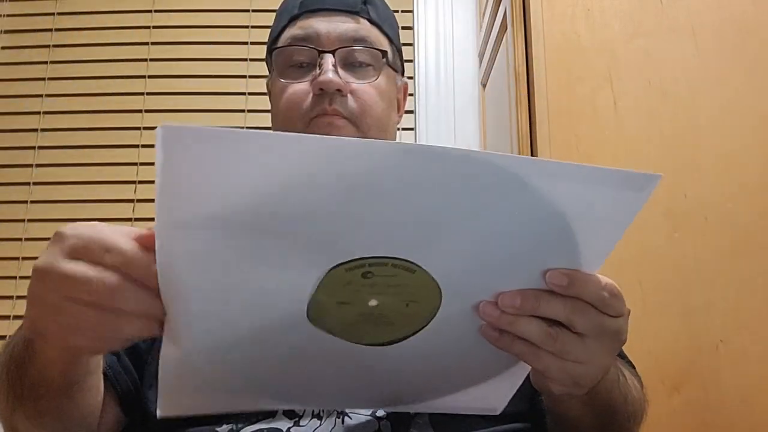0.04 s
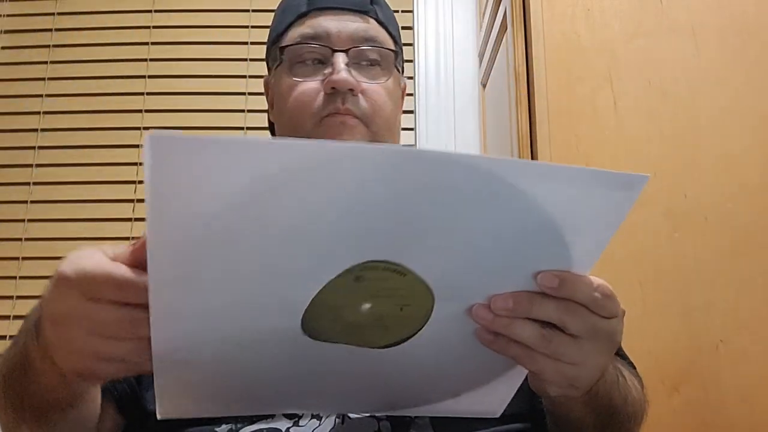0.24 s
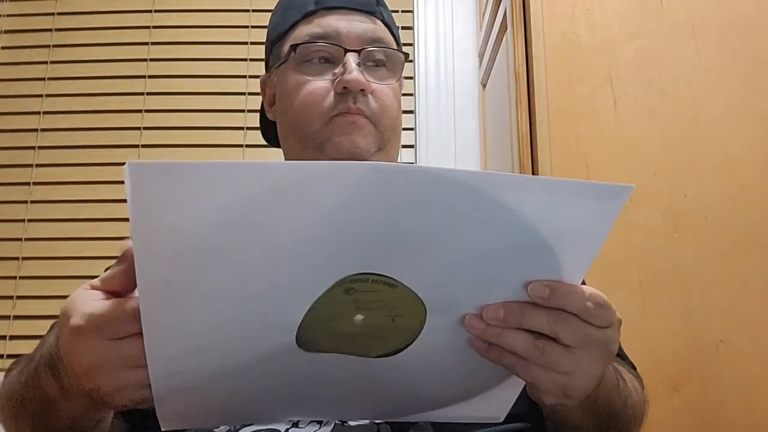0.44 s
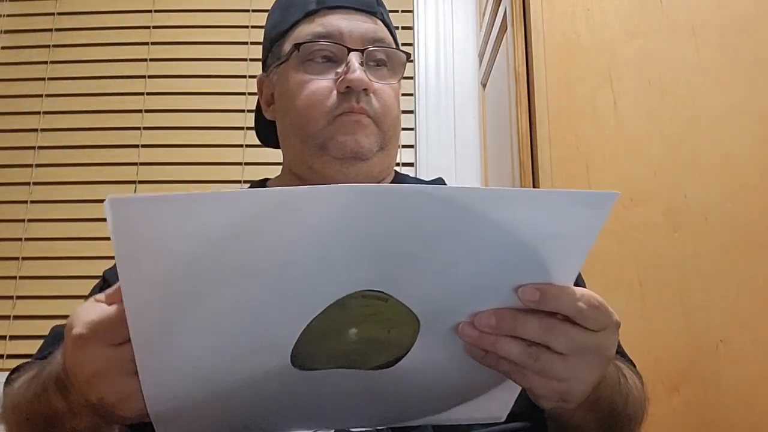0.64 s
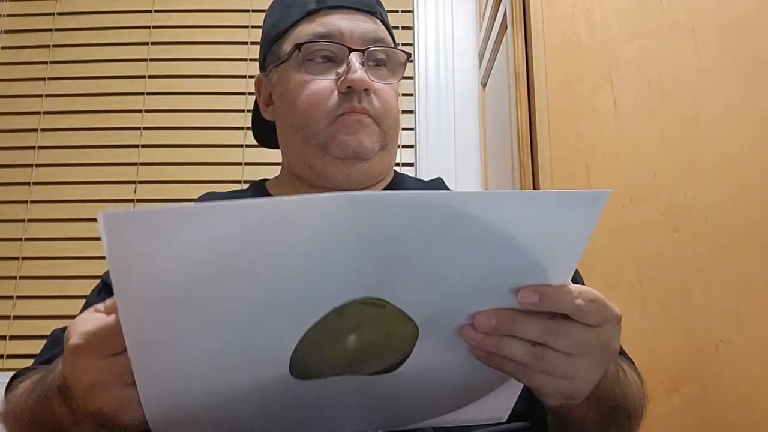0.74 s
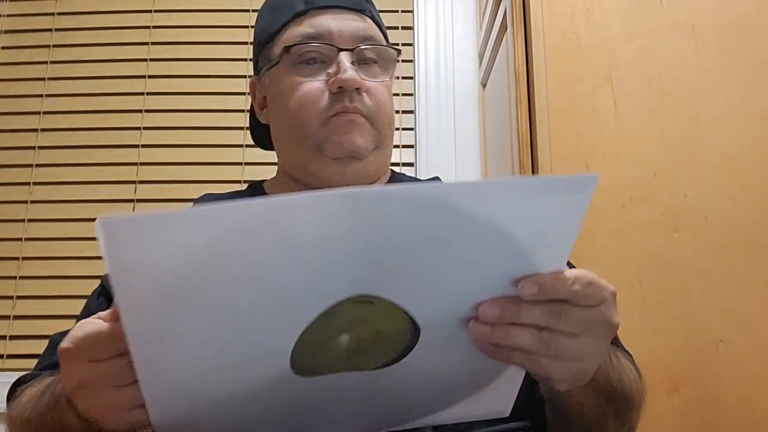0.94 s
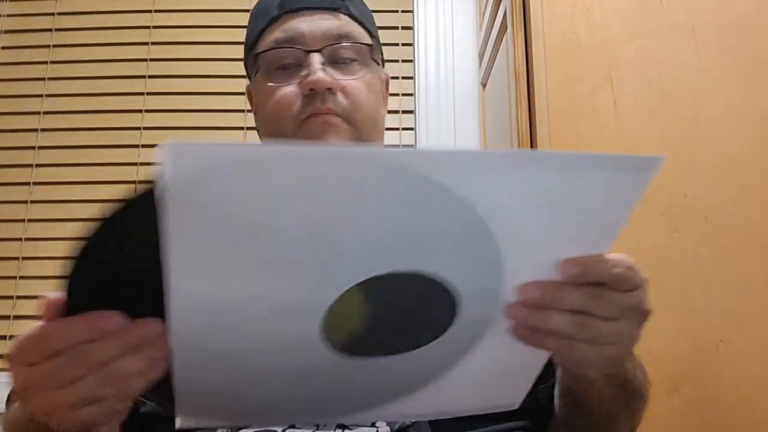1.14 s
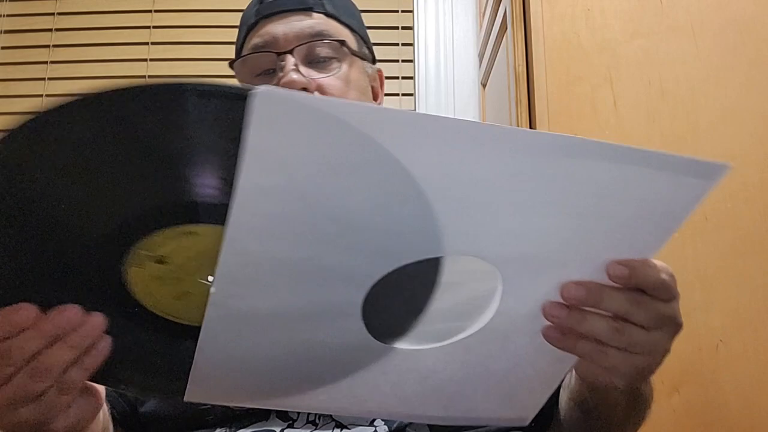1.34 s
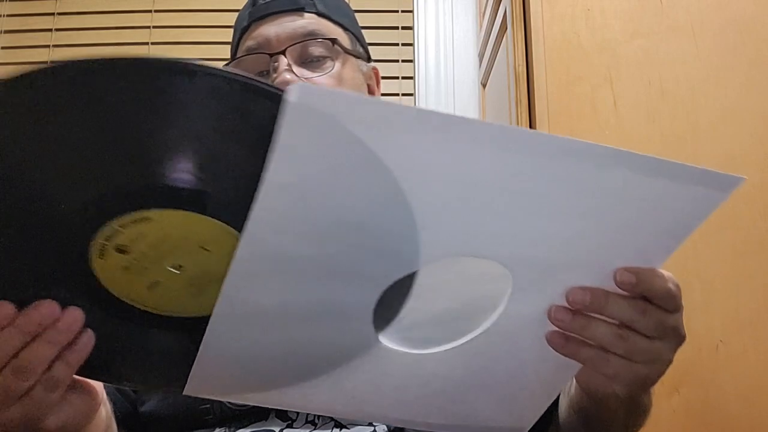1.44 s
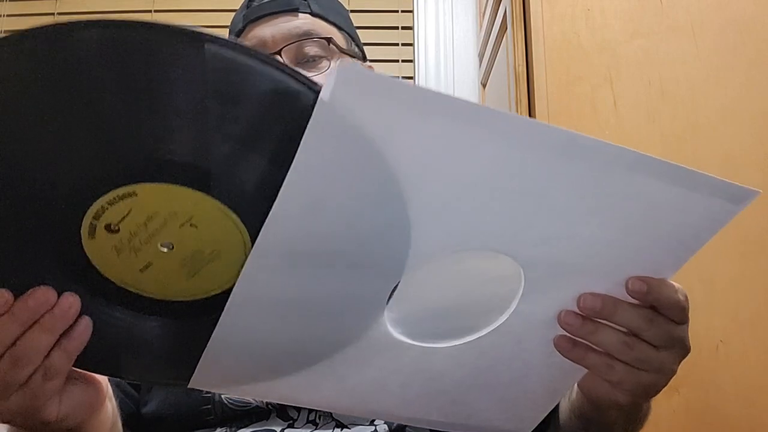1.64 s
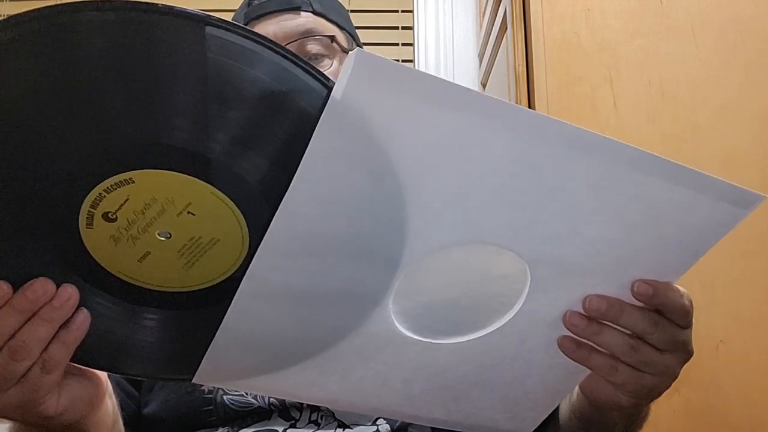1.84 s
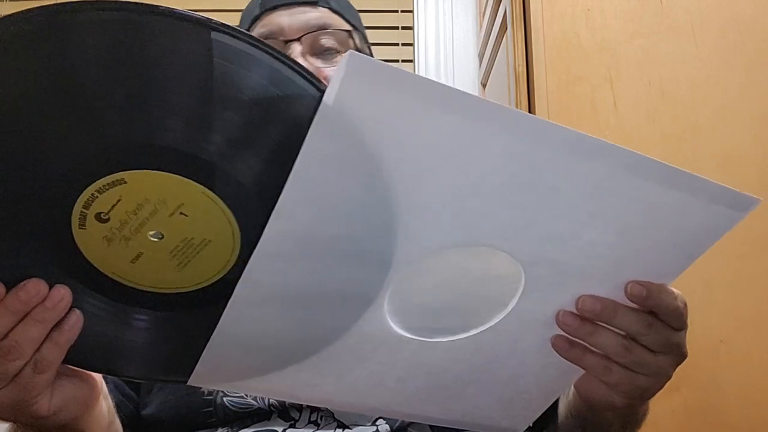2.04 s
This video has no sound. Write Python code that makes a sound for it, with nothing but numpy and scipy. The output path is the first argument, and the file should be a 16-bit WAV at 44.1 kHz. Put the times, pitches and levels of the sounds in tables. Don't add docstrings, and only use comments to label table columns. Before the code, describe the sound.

Paper record sleeve rustles and pops sharply, then a vinyl disc slides out with a hiss

```python
import sys
import numpy as np
from scipy import signal
from scipy.fft import rfft, irfft, next_fast_len
from scipy.io import wavfile
from scipy.ndimage import uniform_filter1d, map_coordinates

SR = 44100
rng = np.random.default_rng(int(sys.argv[2]) if len(sys.argv) > 2 else 0)


def voltage_ratio(level):
    return 10 ** (np.asarray(level, float) / 20)


def wav_out(sig):
    wavfile.write(sys.argv[1], SR, np.round(np.clip(np.atleast_2d(sig).T, -1, 1) * 32767).astype(np.int16))


N = 92610


def unit(x):
    return x / np.sqrt(np.mean(x ** 2) + 1e-20)


def along(points, hz):
    f, value = np.transpose(points)
    return np.interp(np.log(hz + 1), np.log(f + 1), value)


def curves(rows):
    s, *columns = np.transpose(rows)
    t = np.arange(N) / SR
    return [np.interp(t, s, column, left=-120, right=-120) for column in columns]


def wobble(rate):
    knots = rng.standard_normal(int(N * rate / SR) + 4)
    return map_coordinates(knots, [np.arange(N) * rate / SR])


def filtered(x, response):
    size = next_fast_len(N + SR // 2)
    hz = np.fft.rfftfreq(size, 1 / SR)
    return irfft(rfft(x, size) * response(hz), size)[..., :N]


def coloured(x, spectrum):
    size = 4096
    gain = voltage_ratio(along(spectrum, np.fft.rfftfreq(size, 1 / SR)))
    cepstrum = irfft(np.log(gain + 1e-4), size)
    cepstrum[1:size // 2] *= 2
    cepstrum[size // 2 + 1:] = 0
    impulse = irfft(np.exp(rfft(cepstrum)), size)
    return signal.fftconvolve(x, np.atleast_2d(impulse / np.linalg.norm(impulse)), axes=1)[:, :N]


def modes(peaks):
    def response(f):
        total = 0
        for k, (centre, width, db) in enumerate(peaks):
            loss = 1j * f * width
            total = total + (-1) ** k * voltage_ratio(db) * loss / (centre * centre - f * f + loss)
        return total
    return response


def spread(pair, alike):
    def turned(hz):
        angle = np.arccos(np.clip(along(alike, hz), -1, 1)) / 2
        return np.array([np.cos(angle), np.sin(angle)])
    mid, side = filtered(pair, turned)
    return np.array([mid + side, mid - side])


# frequency in Hz, level in dB per Hz.
HUM_COLOUR = [(20, -19), (70, -15), (300, -15.5), (500, -19), (1250, -41.5), (1900, -38), (3000, -48.5),
              (16000, -50.5)]
# frequency in Hz, width in Hz, level in dB.
HUM_MODES = [(68, 18, -3), (300, 71, 2)]
# frequency in Hz, left-right likeness from -1 to 1.
HUM_ALIKE = [(60, 1), (380, 0.86), (2380, 0.023), (15000, -0.09)]
HUM_DB, HUM_SWELL_DB = -59.5, 1.5


def hum():
    noise = rng.standard_normal((2, N)) * voltage_ratio(HUM_SWELL_DB * wobble(11))
    shaped = filtered(noise, lambda hz: voltage_ratio(along(HUM_COLOUR, hz)) * (1 + abs(modes(HUM_MODES)(hz))))
    return voltage_ratio(HUM_DB) * unit(spread(shaped, HUM_ALIKE))


def slips(rate, size_db, fizz_db):
    slip_cap_db = 12
    hit = rng.random((2, N)) < rate / SR
    over_db = np.minimum(size_db * rng.exponential(size=(2, N)), slip_cap_db)
    size = voltage_ratio(over_db) * rng.standard_normal((2, N))
    return unit(unit(hit * size) + voltage_ratio(fizz_db) * rng.standard_normal((2, N)))


# frequency in Hz, level in dB per Hz.
SHEET = [(90, -48), (170, -12), (290, -4), (520, -6), (1190, -12.5), (2300, -7), (6000, -22.5),
         (9000, -60.5)]
# frequency in Hz, level in dB per Hz.
FIBRE = [(2060, -28), (3500, -2), (4460, -1), (7180, 0), (7850, 1.5), (10700, -7.5), (12900, -3),
         (14900, -3.5), (16000, -19)]
# frequency in Hz, width in Hz, level in dB.
POCKET = [(1806, 120, 6), (2460, 140, 1.5), (3375, 420, 0.5), (7830, 341, 0)]


def friction(body_db, fibre_db, rate, clump_db, fizz_db):
    clumps = voltage_ratio(clump_db * wobble(39.8) + clump_db * wobble(150))
    body_drive = voltage_ratio(body_db) * clumps * slips(rate, 2.12, fizz_db)
    body = coloured(body_drive, SHEET) * [[1], [.7]]
    fibre_gain = voltage_ratio(fibre_db + 1.5 * wobble(25.02))
    fibre = coloured(fibre_gain * clumps * slips(4 * rate, 2.5, fizz_db + 12.0), FIBRE)
    return filtered(body + fibre, lambda hz: 1.093 + 0.47 * abs(modes(POCKET)(hz)))


# time in seconds, pressure in dB, fibre hiss over it in dB.
RUB = [
    [(0, -74.5, 0.5), (.05, -71, 6.5), (.06, -47, -13), (.11, -61, 2), (.124, -47.5, -14),
     (.15, -55.5, -5.5)],
    [(.29, -49.5, -12), (.382, -56.5, 2), (.392, -46, -1.5), (.44, -50, -5), (.46, -48.5, -2.5),
     (.568, -65, -3.5), (.598, -65, -5)],
    [(.608, -47, -10.5), (.68, -51.5, -1), (.764, -48, 0.5), (.818, -57, -4), (.87, -50, -0.5),
     (.956, -56.5, -4), (1.0, -70, -6)],
]
RUB_DB = -1.5


def fingers():
    rows = sorted(row for gesture in RUB for row in gesture)
    pressure_db, fibre_db = curves(rows)
    return friction(pressure_db + RUB_DB, pressure_db + fibre_db + RUB_DB, 2500, 0.93, 2.3)


# start in seconds, level in dB,
# length in ms, pitch in Hz, crisp edge in dB.
SNAPS = [(.062, -41.5, 1.8, 2020, 2.5), (.071, -50.5, 2.3, 2520, 7), (0.08, -49, 2, 3000, 8),
         (.084, -49.5, 4, 1140, -5), (.122, -39.5, 4.8, 2130, -33.5), (0.162, -33, 3.2, 7550, 1),
         (0.1685, -36, 2.3, 11420, -0.5), (.2282, -44, 8, 2450, 1.5), (0.2347, -44, 8.2, 12920, -4.5),
         (0.2409, -46, 5, 13100, 0.5), (.392, -39.5, 6.8, 2370, -19), (0.407, -42.5, 14, 2140, -11),
         (.42, -57, 2.9, 1560, -7), (.443, -48, 5.7, 2190, -16), (0.45, -45, 3.8, 1800, -16),
         (.455, -48, 0.96, 2520, 13), (.473, -40, 2.3, 1560, -2), (.612, -47, 12, 2090, -8),
         (0.6435, -56, 2, 9100, 5), (.731, -48.5, 12, 2330, -16), (.768, -48.5, 8.2, 2400, -23),
         (0.866, -46, 6.5, 1960, 0.5), (.876, -43.5, 4.1, 4560, -6), (.943, -63, 4, 3000, -10),
         (1.0612, -42, 11, 406, -20),
    (1.0688, -41.5, 9, 2060, -13),
    (1.1052, -40.5, 3.4, 460, -21),
    (1.2044, -47, 4, 12700, -13),
    (1.232, -47, 17, 2250, -20),
    (1.2984, -46, 4.6, 445, -9.5),
    (1.3216, -39.5, 3, 9300, -8),
    (1.4007, -48.5, 3.4, 318, -19.5),
    (1.5146, -53, 2.2, 2080, -7),
    (1.5716, -54.5, 2.8, 2450, 0),
]
SNAP_Q, SNAP_BODY_DB = 1.55, -2.5
SIDE_SHARE = 0.37


def snaps():
    out, drive = np.zeros((2, N + SR)), np.zeros((2, 2, N + SR))
    t = np.arange(SR // 20) / SR
    for s, db, ms, pitch_hz, edge_db in SNAPS:
        life = max(ms, .3) / 1000
        envelope = voltage_ratio(-25 * t / life) * (1 - np.exp(-8 * t / life))
        burst = envelope * rng.standard_normal((3, 2, len(t)))
        crease = signal.iirpeak(pitch_hz, SNAP_Q, SR)
        ring = signal.lfilter(*crease, signal.lfilter(*crease, burst[0]))
        size = voltage_ratio(db) * np.sqrt(life * SR) * np.array([[1], [SIDE_SHARE]])
        at = slice(round(s * SR), round(s * SR) + len(t))
        out[:, at] += size * ring / np.linalg.norm(ring, axis=1, keepdims=True)
        kick = burst[1:] / np.linalg.norm(burst[1:], axis=2, keepdims=True)
        drive[..., at] += size * kick * voltage_ratio([SNAP_BODY_DB, edge_db])[:, None, None]
    return out[:, :N] + coloured(drive[0, :, :N], SHEET) + coloured(drive[1, :, :N], FIBRE)


# time in seconds, effort in dB, crisp edge over it in dB.
POP = [
    (.159, -64.5, -9.5),
    (.163, -20.5, -10),
    (.167, -18, -13.5),
    (.178, -26.5, -10.5),
    (.185, -31, -12.5),
    (.209, -36, -7.5),
    (.224, -34.5, -12),
    (.255, -40.5, -6.5),
    (.31, -67, -4.5),
]
# frequency in Hz, width in Hz, level in dB.
POP_MODES = [(435, 32, -11.5), (700, 24, -6), (919, 46, -4.5), (1490, 44.2, -16.5), (1973, 41, -3.5),
             (2270, 28, -9), (2560, 170, -5), (3670, 34, -2.5), (4020, 20.4, -19)]
# frequency in Hz, level in dB per Hz.
POP_COLOUR = [(60, -13.5), (200, -11.5), (430, -4.5), (800, -5), (1200, -11), (2200, 0.5), (3400, -1),
              (6500, -21.5)]
# frequency in Hz, level in dB per Hz.
CRUMPLE_COLOUR = [(60, -7.5), (550, -1.5), (700, -3), (1130, -10), (1560, -0.5), (2300, -2.5), (3500, -8),
                  (6000, -25.5)]
POP_SLIPS, POP_FIZZ_DB = 5000, 1
POP_RING_DB, POP_FLUTTER_DB = -10, 2
SLACK_S, SLACKEN_S = .2, 0.0047


def pop():
    effort_db, edge_db = curves(POP)
    volley = slips(POP_SLIPS, 0.64, POP_FIZZ_DB)
    gain = voltage_ratio(effort_db + POP_FLUTTER_DB * wobble(200)) * [[1], [SIDE_SHARE]]
    push = volley * gain
    ring = filtered(push, modes(POP_MODES)) / np.std(filtered(volley, modes(POP_MODES)))
    edge = coloured(slips(POP_SLIPS, 1.5, 0) * voltage_ratio(effort_db + edge_db), FIBRE)
    slack = .5 + .5 * np.tanh((np.arange(N) / SR - SLACK_S) / SLACKEN_S)
    body = coloured(push * (1 - slack), POP_COLOUR) + coloured(push * slack, CRUMPLE_COLOUR)
    return body + voltage_ratio(POP_RING_DB) * ring + edge


# start in seconds, peak in dB, pitch in Hz, 60 dB decay in ms.
CRACKS = [(.1642, -19.5, 1074, 7), (.1665, -9, 2700, 2.4), (.1675, -11.5, 2300, 9.2), (.1688, -7, 3200, 7),
          (.1707, -8, 2400, 4.8), (.1721, -11.5, 3300, 7.4), (.1738, -13, 2300, 3.7),
          (.1760, -17, 890, 8.5), (.1771, -10, 2200, 8), (.1806, -22.5, 2900, 5.8), (.1824, -23, 2300, 5.3),
          (.2128, -24, 1520, 16), (.2202, -27.5, 1300, 9.7), (.2225, -25.5, 900, 12.6),
          (.2272, -22.5, 1700, 9.5), (.2298, -27, 2600, 2.7), (.2375, -29, 690, 18),
          (.2468, -29.5, 430, 55), (.2715, -32, 800, 9.7), (0.3931, -35, 2400, 7.1), (0.4731, -35, 1600, 4),
          (0.769, -33.5, 1850, 16), (.7695, -42, 500, 9.7), (.9435, -36, 680, 12), (.9525, -43, 700, 12),
          (1.1055, -27.5, 900, 8.3), (1.1525, -16.5, 1000, 3.4), (1.1530, -22, 2100, 8),
          (1.1535, -21.5, 3600, 6.9), (1.1542, -22, 600, 7.9), (1.4405, -38.5, 420, 17),
          (1.4475, -45, 600, 19), (1.5145, -40.5, 1200, 4.5)]
KICK_LOW_HZ = 250


def cracks():
    out, t = np.zeros(N + SR), np.arange(SR // 20) / SR
    for s, db, pitch_hz, ms in CRACKS:
        envelope = voltage_ratio(db - 60000 * t / max(ms, 1)) * (1 - np.exp(-6 * pitch_hz * t))
        out[round(s * SR):][:len(t)] += envelope * np.sin(2 * np.pi * pitch_hz * t)
    thinned = filtered(out[:N], lambda hz: (1j * hz / (KICK_LOW_HZ + 1j * hz)) ** 2)
    return thinned * [[1.4], [SIDE_SHARE]]


# time in seconds, level in dB, pitch in Hz, length in seconds.
WHUMPS = [(0.186, -53, 55.2, 0.026), (0.238, -43, 84, 0.026), (0.413, -57.5, 69, 0.04),
          (0.614, -60, 68.4, 0.023), (0.79, -54, 68, 0.027), (1.094, -58, 66.6, 0.057),
          (1.4, -58.5, 64.7, 0.14), (1.6, -48, 269, 0.011), (1.628, -48.5, 258, 0.0075),
          (1.939, -54.5, 300, 0.011), (1.975, -57, 65.7, .06), (1.767, -58.5, 65.8, 0.043),
          (2.083, -56.5, 310, 0.019)]


def whumps():
    t, out = np.arange(N) / SR, np.zeros(N)
    for s, db, hz, length in WHUMPS:
        swell = voltage_ratio(db) * np.exp(-((t - s) / length) ** 2)
        out += swell * np.sin(2 * np.pi * hz * (t - s))
    return out


# time in seconds, speed as level in dB, sheet body over it in dB.
SLIDE = [
    [(.975, -62, 5.5), (1.04, -46, -1), (1.065, -39.5, -2), (1.12, -35, -10), (1.196, -36, -7),
     (1.215, -42.5, -3), (1.29, -40.5, -5.5), (1.33, -37.5, -9), (1.365, -45, -6)],
    [(1.43, -47.5, -4.5), (1.49, -53.5, -3), (1.58, -56.5, -3.5), (1.66, -68, -3.5), (1.75, -75.5, -1.5),
     (1.9, -76, -10), (1.95, -91.5, -4.5), (2.1, -89.5, -5)],
]
# centre in seconds, length in seconds, pitch in Hz, level in dB.
SQUEAKS = [
    (1.419, .008, 3230, -39.5),
    (1.4755, 0.0018, 4380, -41.5),
    (1.4755, .002, 8250, -44),
    (1.447, .002, 3050, -47),
]
SQUEAK_ARCH = .04


def slide():
    level_db, body_db = curves(SLIDE[0] + SLIDE[1])
    t = np.arange(N) / SR
    drift = 1 + .014 * wobble(200)
    squeak = np.zeros(N)
    for s, length, hz, db in SQUEAKS:
        away = np.minimum(((t - s) / length) ** 2, 20)
        phase = 2 * np.pi * hz * np.cumsum(drift - SQUEAK_ARCH * away) / SR
        squeak += voltage_ratio(db) * np.exp(-away) * np.sin(phase)
    return friction(level_db + body_db, level_db, 2500, 0.47, 4) + squeak * [[1], [.3]]


def patchy(x, depth_db):
    z = signal.stft(x, nperseg=256)[2]
    field = uniform_filter1d(rng.standard_normal(z.shape[1:]), size=6, axis=0)
    field = uniform_filter1d(field, size=10, axis=1)
    return signal.istft(z * voltage_ratio(depth_db * unit(field)), nperseg=256)[1][:, :N]


# frequency in Hz, 60 dB decay in seconds.
ROOM_DECAY = [(200, 0.46), (2000, 0.1), (10000, 0.086)]


def room(x):
    hz, t, z = signal.stft(rng.standard_normal((2, SR // 2)), SR, nperseg=256)
    decay = voltage_ratio(-60 * t / along(ROOM_DECAY, hz)[:, None])
    tail = signal.istft(z * decay, SR, nperseg=256)[1]
    late = np.pad(x, (150, 0))[None]
    return signal.fftconvolve(late, tail / np.linalg.norm(tail[0]), axes=1)[:, :N]


# frequency in Hz, left-right likeness from -1 to 1.
PAPER_ALIKE = [(60, 1), (240, 1), (950, 0.35), (3770, -0.14), (15000, -0.27)]
ROOM_DB = -12


def scene():
    rubbing = patchy(fingers() + slide(), 1.8)
    paper = rubbing + snaps() + pop() + cracks()
    return spread(paper + voltage_ratio(ROOM_DB) * room(paper[0]), PAPER_ALIKE) + whumps() + hum()


def band_limit(x):
    return signal.sosfilt(signal.butter(12, 16430, fs=SR, output="sos"), x)


# frequency in Hz, left over right in dB.
LEAN = [(60, 7), (380, 0.5), (2380, 3.5), (15000, -1.5)]
TOP_HZ, TOP_EDGE_HZ = 15700, 250


def record(dry):
    def ports(hz):
        balance = voltage_ratio(along(LEAN, hz) / 2 * np.array([[1], [-1]]))
        return balance * np.clip(.5 - (hz - TOP_HZ) / TOP_EDGE_HZ / 2, 0, 1) ** 2
    return band_limit(filtered(dry, ports))


dry = scene()
out = record(dry)
wav_out(out)
```